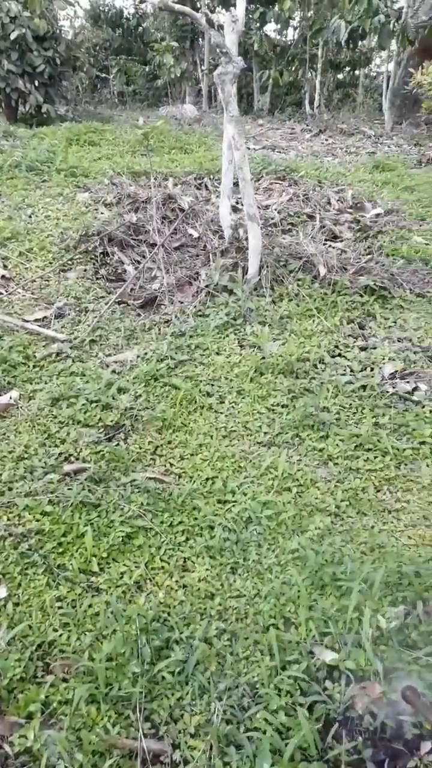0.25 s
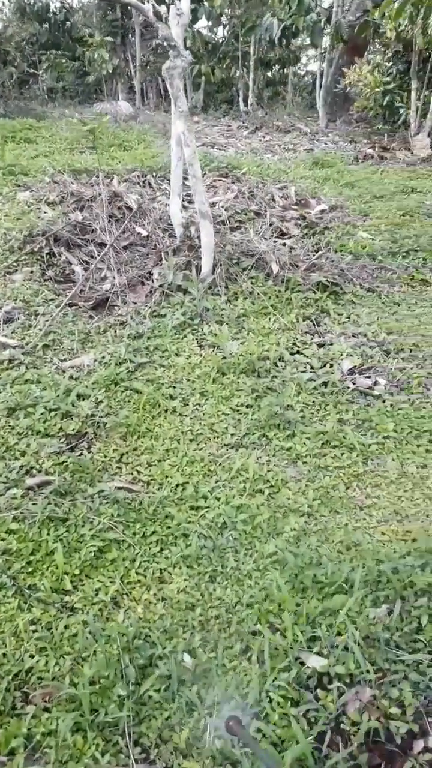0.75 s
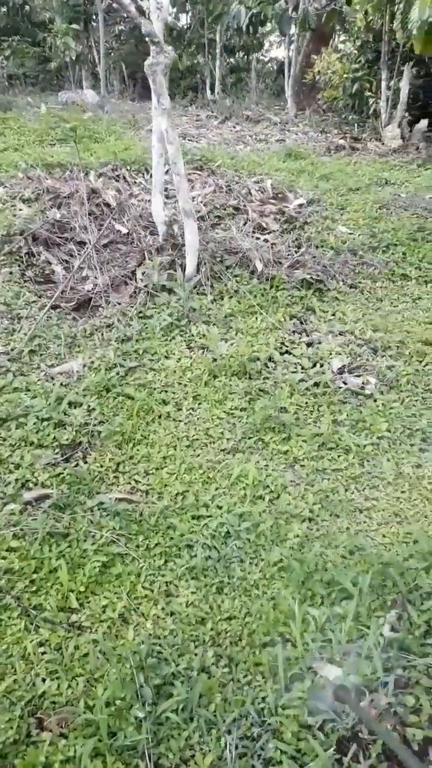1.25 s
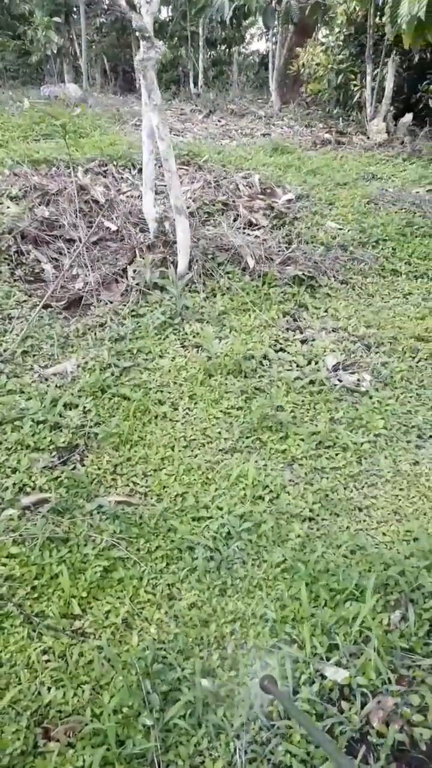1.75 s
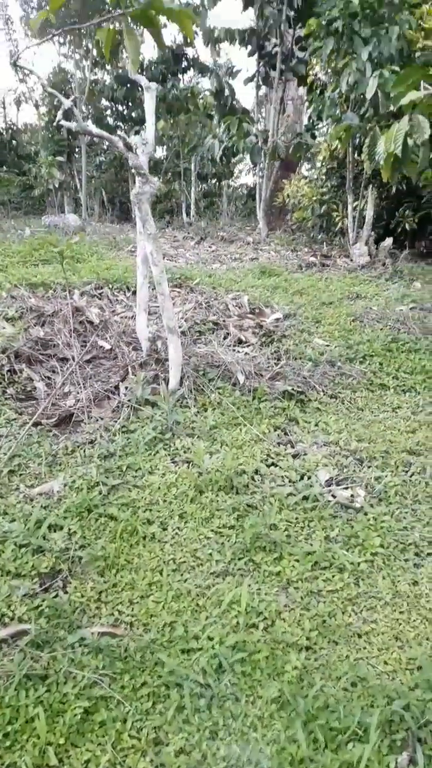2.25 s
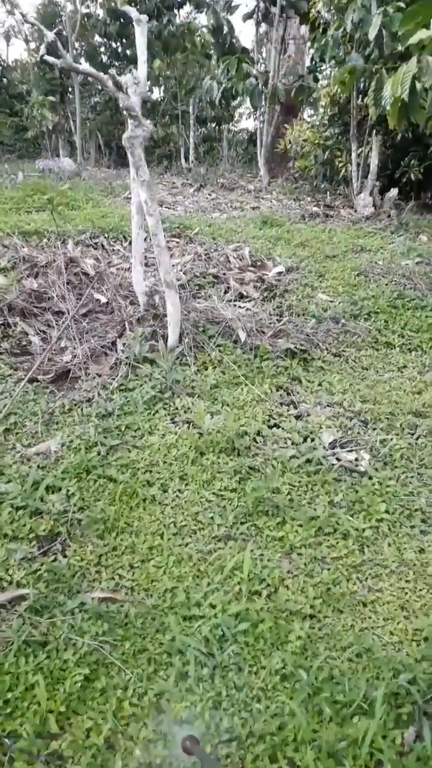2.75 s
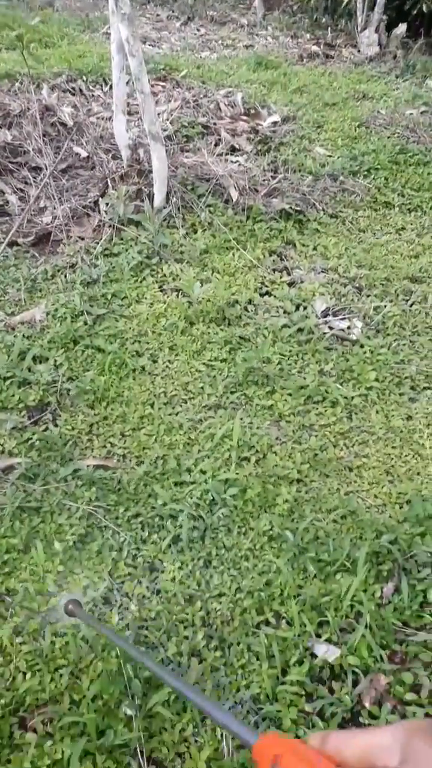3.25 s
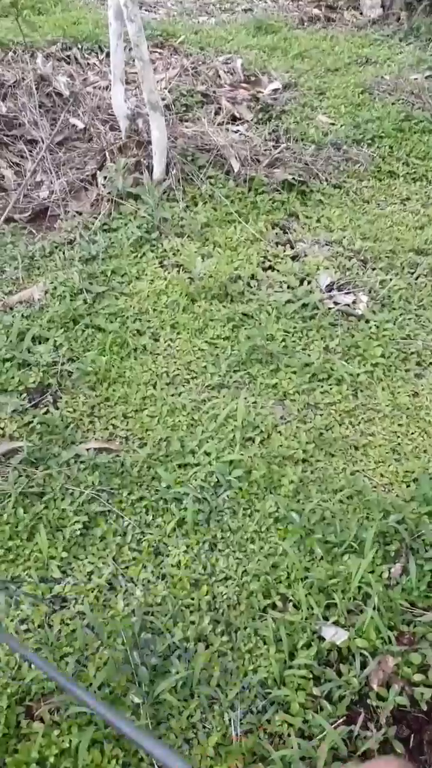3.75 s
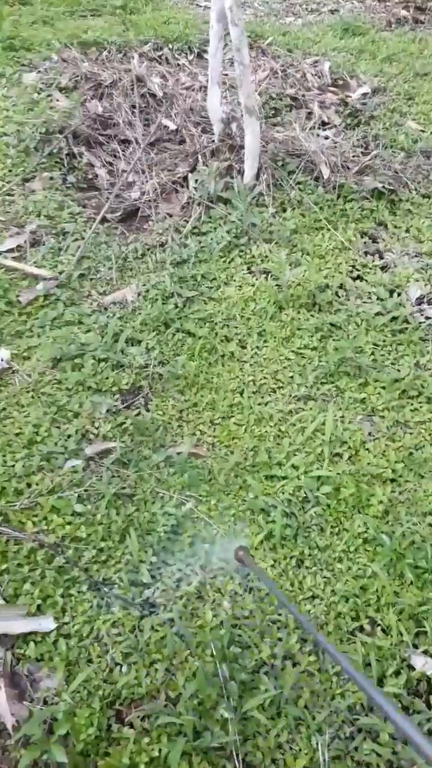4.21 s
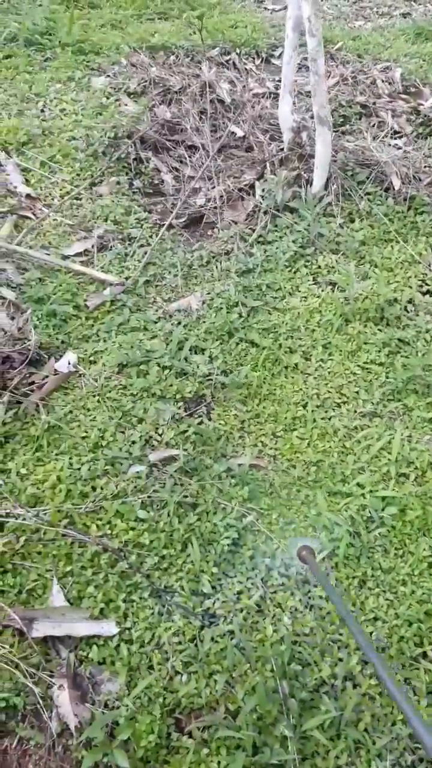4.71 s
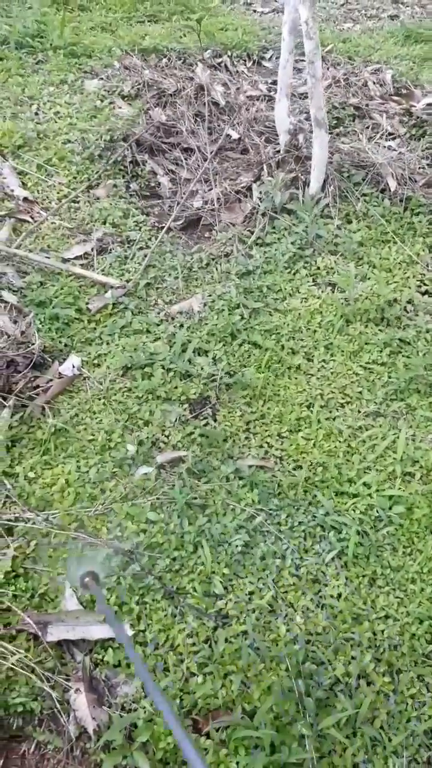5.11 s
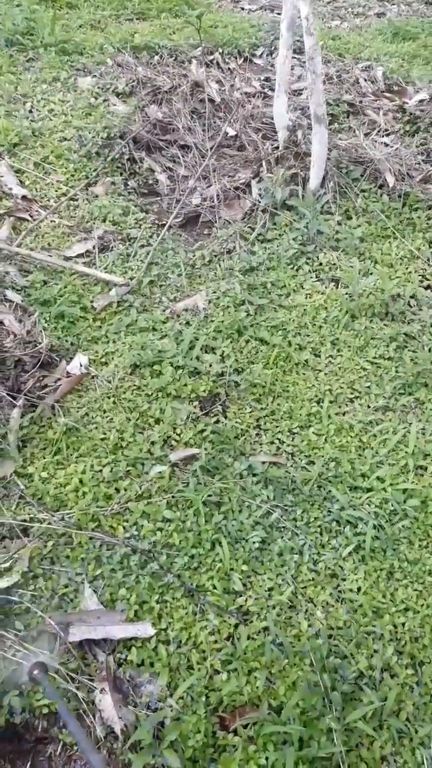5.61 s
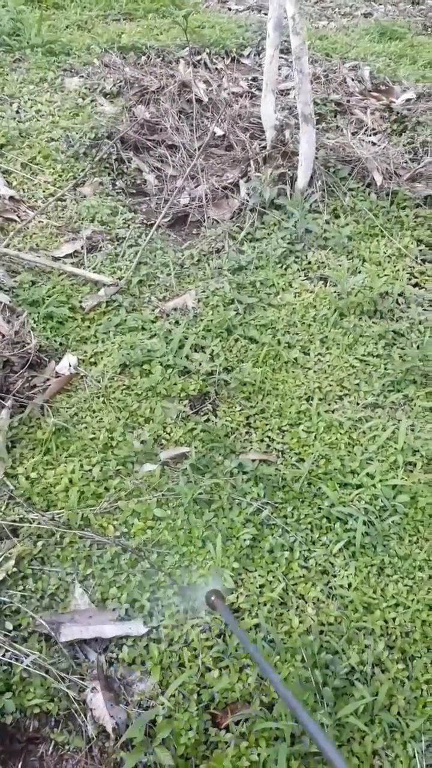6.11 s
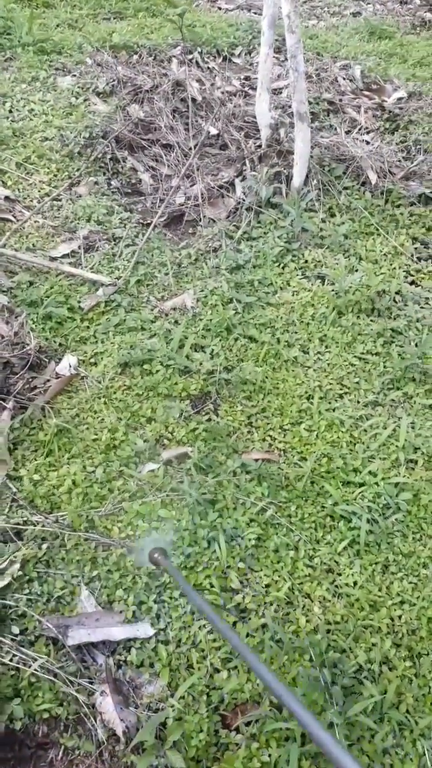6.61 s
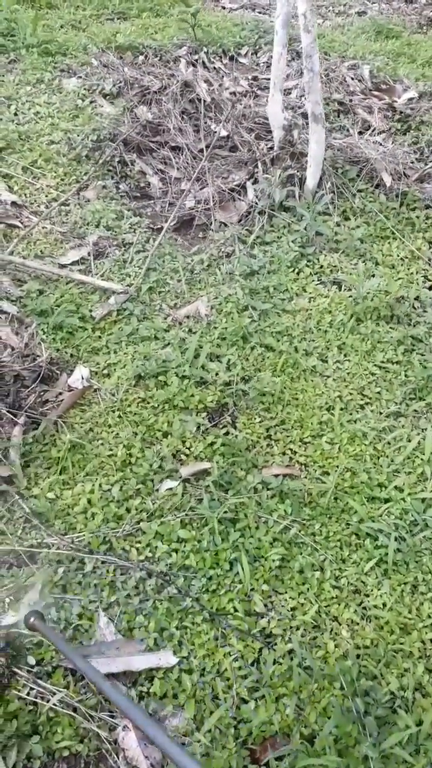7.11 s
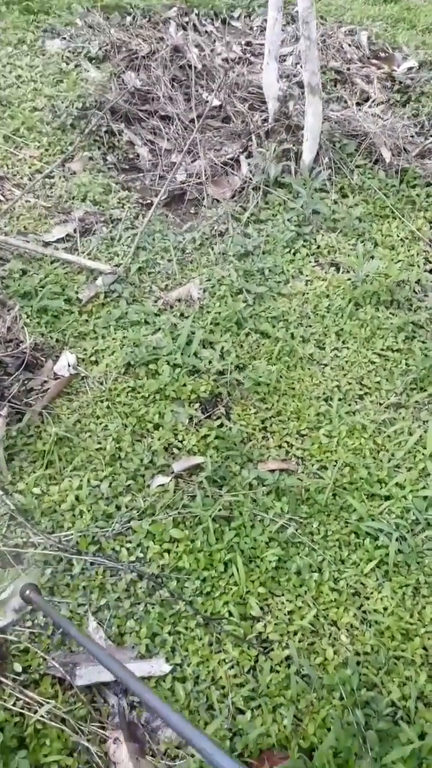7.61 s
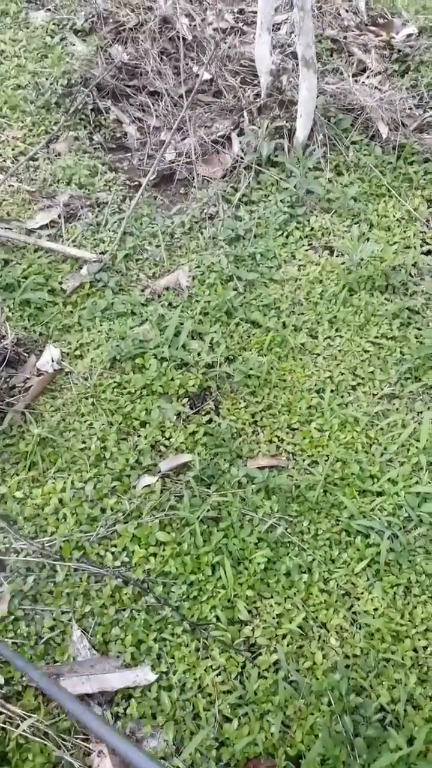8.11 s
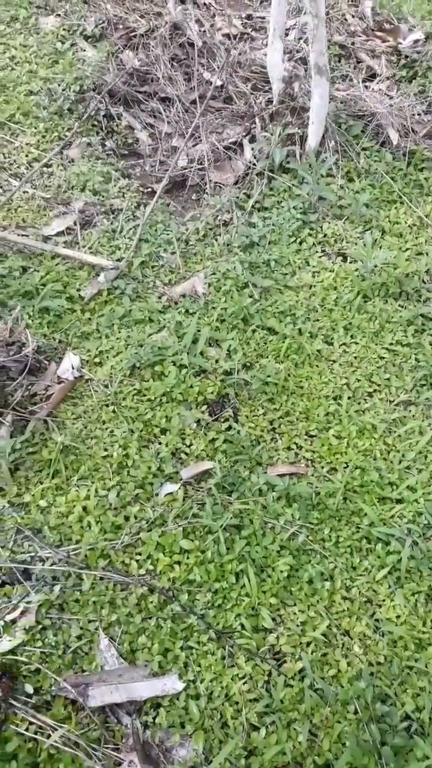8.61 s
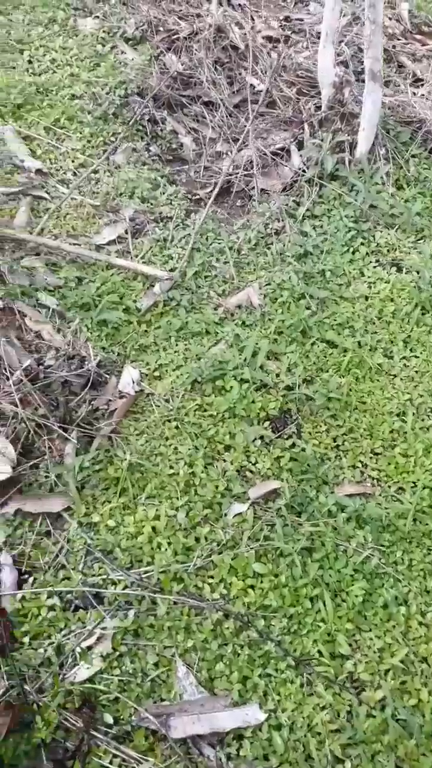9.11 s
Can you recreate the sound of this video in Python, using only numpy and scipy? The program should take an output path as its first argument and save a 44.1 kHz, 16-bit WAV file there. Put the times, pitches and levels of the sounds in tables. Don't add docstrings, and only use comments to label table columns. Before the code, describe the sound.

A spray lance hisses and fizzes steadily, fine mist pattering on leaves, with low wind thumps early on and a few dry twig snaps.

```python
import sys
import numpy as np
from scipy import signal
from scipy.io import wavfile
from scipy.ndimage import uniform_filter1d

SR = 44100
rng = np.random.default_rng(int(sys.argv[2]) if len(sys.argv) > 2 else 0)


def store_pcm(level_fs):
    pcm = np.round(np.clip(level_fs, -1, 1) * 32767).astype(np.int16)
    wavfile.write(sys.argv[1], SR, np.atleast_2d(pcm).T)


def level_to_linear(level):
    exponent = np.asarray(level, float) / 20
    return 10 ** exponent


N = 412335


def evened(x):
    return x / np.sqrt(np.mean(abs(x) ** 2) + 1e-20)


def add(mix, s, sound):
    part = mix[round(s * SR):][:len(sound)]
    part += sound[:len(part)]


def filtered(x, order, band_hz):
    return signal.sosfilt(signal.butter(order, band_hz, "bandpass", fs=SR, output="sos"), x)


def curves(rows, t):
    s, *columns = np.transpose(rows)
    return [np.interp(t, s, column) for column in columns]


def strongest_move(rows, t):
    moves = []
    for s, rise, hold, fall, db in rows:
        rising = (t - s) / abs(rise)
        falling = 1 - (t - s - rise - hold) / abs(fall)
        moves.append(db * np.clip(np.minimum(rising, falling), 0, 1))
    return np.max(moves, axis=0)


def read(points, hz):
    f, value = np.transpose(points)
    return np.interp(np.log(hz + 1), np.log(f + 1), value)


def coloured(x, points, field_db=0, shift_hz=np.zeros(1), size=1024):
    hz, _, z = signal.stft(x, SR, nperseg=size, noverlap=size * 3 // 4)
    spectrum = evened(level_to_linear(read(points, abs(hz[:, None] - shift_hz))))
    z = z * spectrum * level_to_linear(field_db)
    return signal.istft(z, SR, nperseg=size, noverlap=size * 3 // 4)[1][:N]


def drops(per_s, spread_db, clump_db):
    size = level_to_linear(spread_db * np.minimum(rng.exponential(1, N), 5))
    size = size * (rng.random(N) < per_s / SR)
    clumps = uniform_filter1d(rng.standard_normal(N), size=300)
    clumps = evened(uniform_filter1d(clumps, size=300))
    return evened(size * rng.standard_normal(N) * level_to_linear(clump_db * clumps))


# pitch_hz, density_db (per Hz)
ORCHARD_RUMBLE = [(25, -9), (60, -33), (129, 0), (172, -9), (280, -5), (343, -1.5), (379, -2), (451, -1.5),
                  (545, -5), (718, -3), (994, -2), (1200, -2), (1560, -12), (2640, -120)]


def air(field):
    return coloured(rng.standard_normal(N), ORCHARD_RUMBLE, field - 45.5)


# start_s, length_s, eddy_level_db, eddy_pitch_hz
GUSTS = [(.35, 0.36, -63, 100), (1.158, 0.16, -41, 100), (1.283, 0.41, -22.5, 129), (1.79, 0.49, -35, 110),
         (2.438, 0.29, -44, 105), (2.85, 0.27, -67, 100), (4.5, .2, -51, 140), (4.69, 0.24, -50, 130),
         (5.1, .3, -61.5, 100), (7.0, 0.27, -65, 100), (7.802, 0.29, -55, 181.5)]


def gust(t, edge_db=15, still_db=-69):
    levels = []
    for s, length, db, _ in GUSTS:
        levels.append(db - edge_db * (2 * (t - s) / length - 1) ** 4)
    levels = np.array(levels)
    return np.maximum(levels.max(0), still_db), np.array(GUSTS)[levels.argmax(0), 3]


# centre_s, peak_db, pitch_hz
PUFFS = [(1.060, -46, 110), (1.090, -41, 95), (1.115, -45, 120), (1.1403, -33, 134),
         (1.1804, -37, 124), (1.1982, -38, 95), (1.2127, -25.5, 114), (1.2238, -33.7, 95),
         (1.2457, -32, 112), (1.279, -29.9, 119), (1.2934, -32.6, 113), (1.3142, -19.5, 133),
         (1.337, -22, 230), (1.3438, -13.5, 137), (1.3569, -15, 151), (1.3764, -14, 148),
         (1.3875, -19, 160), (1.397, -21, 230), (1.4006, -13, 122), (1.412, -21, 160),
         (1.425, -19, 131), (1.4376, -22, 170), (1.4623, -17, 136), (1.478, -14, 200),
         (1.4959, -17, 131), (1.5175, -15, 181), (1.5239, -16, 160), (1.5531, -23.7, 173),
         (1.5758, -19, 148), (1.592, -21, 150), (1.6005, -20.5, 270), (1.605, -10.5, 191),
         (1.6194, -16, 152), (1.6369, -14.5, 167), (1.6558, -20, 114), (1.6645, -18, 160),
         (1.6767, -16.5, 140), (1.6901, -15, 140), (1.7091, -16, 170), (1.7265, -16.5, 230),
         (1.7394, -17.5, 114), (1.7576, -31, 125),
         (1.815, -34, 100), (1.826, -33, 90), (1.8552, -33, 95), (1.8732, -28, 123), (1.888, -31, 90),
              (1.9023, -25, 110), (1.912, -25, 100), (1.9254, -27, 118), (1.939, -26, 162),
              (1.9582, -20, 105), (1.973, -23, 130), (1.9822, -27, 105), (1.999, -21, 152),
              (2.015, -24, 100), (2.0334, -16.5, 129), (2.043, -19.5, 243), (2.047, -26, 277),
              (2.051, -13.5, 143), (2.06, -20, 110), (2.077, -25, 143), (2.1222, -28, 88),
              (2.143, -28, 121), (2.1655, -29, 112), (2.179, -27, 199), (2.1853, -26, 162),
              (2.198, -26, 95), (2.221, -35.4, 129), (2.2462, -36, 85), (2.270, -41, 70), (2.462, -36, 100),
              (2.5075, -37, 117), (2.544, -29, 115), (2.5569, -38, 103), (2.588, -36, 130),
              (2.611, -32.0, 117), (2.640, -28, 106), (2.685, -41, 95), (4.5444, -28, 125),
              (4.577, -38, 122), (4.660, -42, 110), (4.7178, -28, 125), (4.733, -37, 132),
              (4.7525, -31.9, 136), (4.838, -30.0, 122), (4.8537, -37, 163)]


def eddies(per_s=46, spread_db=-2, spread_oct=0.15, suck=0.51, suck_spread=0.058):
    late, size, pitch = rng.standard_normal((600, 3)).T
    s = (np.arange(600) + 3 + .25 * late) / per_s
    db, hz = gust(s)
    small_db = db + spread_db * size.clip(-2, 1.2)
    small = np.transpose([s, small_db, hz * 2 ** (spread_oct * pitch), *rng.random((600, 3)).T])
    hard = PUFFS
    phases = suck + rng.standard_normal((len(hard), 3)) * [suck_spread, 2 * suck_spread, 1]
    return np.vstack([small[db > -55], np.hstack([hard, phases])])


def wind(cycles=0.58, edge=0.4, sway=0.15, churn_db=-10, draught_top_db=-51):
    out = np.zeros(N)
    t = np.arange(-.04, .04, 1 / SR)
    for s, db, hz, phase, edge_phase, sway_phase in eddies():
        push = np.exp(-(t * hz / cycles) ** 2) * np.cos(2 * np.pi * (hz * t + phase))
        sharp = edge * (min(hz, 185) / 170) ** 2 * level_to_linear(0.22 * (db + 18))
        edge_tone = np.cos(2 * np.pi * (1.68 * hz * t + edge_phase))
        push += sharp * np.exp(-(t * hz * 1.7 / cycles) ** 2) * edge_tone
        sway_tone = np.cos(2 * np.pi * (75 * t + sway_phase))
        push += sway * (125 / hz) ** 2 * np.exp(-(t * 60) ** 2) * sway_tone
        add(out, s - .04, level_to_linear(db) * push)
    churn = evened(filtered(rng.standard_normal(N), 4, [80, 250]))
    strength = np.sqrt(abs(uniform_filter1d(out ** 2, size=1100)))
    draught = evened(filtered(rng.standard_normal(N), 3, [52, 100]))
    calm = level_to_linear(np.minimum(gust(np.arange(N) / SR)[0], draught_top_db) + 2.5)
    return out + level_to_linear(churn_db) * strength * churn + calm * draught


# start_s, length_s, level_db
SCUFFS = [
    (3.86, 0.14, -42.5),
    (3.82, .03, -51),
    (6.72, 0.096, -50.5),
    (0.19, 1.23, -53),
    (5.9, 1.4, -56),
    (8.67, 0.083, -44),
]


def scuffs():
    level, t = np.zeros(N), np.arange(N) / SR
    for s, length, db in SCUFFS:
        level += level_to_linear(db) * np.sin(np.pi * np.clip((t - s) / length, 0, 1)) ** .5
    return level * evened(filtered(drops(900, 2.6, 2.2), 2, (342, 820)))


def strike(ms_gone, rise_ms):
    return 1 - np.exp(-(ms_gone / rise_ms) ** 2)


def ring(ms_gone, hz, decay_ms):
    return np.sin(2 * np.pi * hz * ms_gone / 1000) * np.exp(-ms_gone / decay_ms)


# start_s, peak_db, low_ring_hz, low_ring_db, ring_ms
SNAPS = [(3.243, -6.5, 840, -13.5, 0.84), (3.2436, -24, 1600, -1, 0.51), (3.2435, -44, 620, 9, 1.5),
         (3.2448, -19, 2750, 0, 0.35), (3.2455, -27, 1400, -2, 0.67), (3.8715, -29, 5950, 10, 0.62),
         (3.874, -27, 6100, 10, .7), (3.877, -31, 6300, 11, .6), (3.889, -33, 1000, 8, 0.62),
         (3.889, -24, 2570, 1, .4), (3.905, -26, 4400, 2, .4), (3.914, -22, 3300, -2, 0.36),
         (3.9175, -22, 4300, 1, .4), (3.921, -22, 3300, 2, 0.46), (3.929, -24, 3300, 1, .4),
         (3.936, -21, 4000, -4, 0.5), (3.942, -27, 3400, 3, 0.44), (3.946, -27, 3020, 2, .5),
         (3.955, -26, 4800, 4, .4), (6.5645, -30, 5800, 10, .6), (6.568, -26, 5900, 9, .4),
         (6.573, -29, 5700, 8, .3), (8.681, -40, 610, 9.5, 1.8), (8.689, -46, 756, 7, 3),
         (8.697, -44, 620, 6, 3), (8.704, -47, 654, 9, 3.3), (8.7206, -30, 980, 7, 0.9),
         (8.722, -42, 600, 6, 1.5)]
# pitch_hz, level_db, ring_time_factor
TWIG_MODES = [
    (3680, -4.5, 0.75),
    (4250, -2, 0.6),
    (7950, -2, 0.62),
    (13800, -26, .3),
]


def snaps(rise_ms=.17):
    out, ms_gone = np.zeros(N), np.arange(500) / SR * 1000
    for s, db, low_hz, low_db, ms in SNAPS:
        crack = np.zeros(500)
        for hz, mode_db, factor in TWIG_MODES + [(low_hz, low_db, 1.6)]:
            crack += level_to_linear(mode_db) * ring(ms_gone, hz, ms * factor)
        add(out, s, -level_to_linear(db) * crack * strike(ms_gone, rise_ms) / 0.62)
    out = out - .7 * signal.lfilter(*signal.iirpeak(6500, 4, fs=SR), out)
    return filtered(out, 2, [350, 9500])


# start_s, peak_db, ring_hz, ring_ms
SLAPS = [
    (3.2432, -23, 7480, .6),
    (3.2455, -26, 850, .9),
    (4.1219, -12, 1650, .3),
    (4.12192, -18, 3120, .8),
    (4.12195, -17, 3900, .3),
    (4.12197, -17, 4700, .4),
    (4.1221, -24, 8500, .7),
    (6.8976, -11, 2500, .3),
    (6.89765, -23, 3300, .5),
    (6.8977, -23, 1700, .4),
]


def slaps(rise_ms=.19):
    out, ms_gone = np.zeros(N), np.arange(400) / SR * 1000
    for s, db, hz, ms in SLAPS:
        add(out, s, level_to_linear(db) * ring(ms_gone, hz, ms) * strike(ms_gone, rise_ms))
    return out


# start_s, shadow_hz, shadow_depth_db, echo_dip_hz, echo_depth_db
BODY = [(0, 5860, 4, 2650, 6), (.6, 6200, 2, 2670, -1), (.9, 6250, -1.5, 2690, 4), (2, 6300, 0.5, 2750, 4),
        (3.1, 6500, -1, 2740, 4), (3.6, 6000, 4, 3040, 6), (4, 6200, 1, 2900, 1), (4.3, 6300, -4, 2800, 5),
        (5, 6440, -6, 2530, 2), (5.3, 6600, 4, 2740, 7), (5.8, 6700, 5, 2650, 2),
        (6.1, 6500, -3, 2760, -2.5), (6.7, 6740, -4.5, 2750, -0.5), (7, 6650, 6, 3110, 9),
        (8, 6500, 4.5, 2900, 6), (8.3, 6500, -2, 2880, 0), (8.7, 6400, 0, 2850, 0),
        (9.35, 6400, -3.5, 2820, -2)]


def body(t):
    return curves(BODY, t)


def dip(hz, centre, depth_db, width_hz):
    return -depth_db * np.exp(-((hz - centre) / width_hz) ** 2)


# start_s, first_dip_hz, first_depth_db, second_dip_multiple, second_depth_db
POSE = [(0, 930, 13, 1.68, 11), (.9, 970, 9, 1.74, 7), (1.5, 970, 6.5, 1.48, 8), (2.6, 900, 9, 1.63, 6),
        (3.3, 910, 7, 1.63, 7), (3.6, 910, 6, 1.9, 1.5), (3.95, 950, -1.5, 1.6, -3),
        (4.3, 1000, 7, 1.6, 2.5), (4.9, 1040, 11, 1.58, 8.5), (5.3, 1100, 11, 1.5, 1.5),
        (5.95, 1090, 10, 1.55, 0), (6.15, 1070, 9, 2.05, 2), (6.7, 1000, .3, 2.2, 0), (7, 1030, 3, 2.1, 4),
        (8, 925, 5.5, 2.1, -1.5), (8.3, 1020, 5, 1.8, 5.5), (9.35, 1020, 0, 1.8, 0)]
# start_s, ring_hz, lift_db
BLADES = [(0, 5000, -5), (.25, 5050, 0), (.47, 5050, 4), (.65, 5100, 0), (1.1, 3850, 0), (1.8, 4300, -2),
          (2, 4250, 5), (2.3, 4250, 2), (2.8, 4500, 2.5), (3.4, 5000, 1.5), (4.2, 4900, -1),
          (5.4, 4800, 1.5), (6.8, 5200, -1.5), (7.1, 5200, 3), (7.8, 5100, 0), (8.35, 5100, -0.5),
          (8.6, 4530, 2), (9.35, 4500, 2.5)]
# start_s, shade_hz, depth_db
ARM = [(0, 14000, -3), (.7, 13900, -2), (1.2, 9600, -0.5), (1.85, 9200, 5), (2.05, 9900, -3),
       (2.4, 11500, 2), (2.7, 12300, 2), (3.2, 13100, -1), (3.6, 14300, 2), (4, 13300, 2),
       (4.35, 14000, -1), (4.7, 14000, 8), (5.3, 14500, 1), (5.85, 13300, 6), (6.2, 15000, 4),
       (6.6, 14500, -1), (6.9, 13500, 3), (9.35, 13500, 1)]


def colouring(patchy_db=1.16):
    hz, t, z = signal.stft(np.zeros(N), SR, nperseg=1024, noverlap=768)
    hz = hz[:, None]
    patches = uniform_filter1d(rng.standard_normal(z.shape), size=8, axis=0)
    patches = patchy_db * evened(uniform_filter1d(patches, size=80, axis=1))
    first_hz, first_db, multiple, second_db = curves(POSE, t)
    ground = dip(hz, first_hz, first_db, 130) + dip(hz, multiple * first_hz, second_db, 170)
    shadow_hz, shadow_db, echo_hz, echo_db = body(t)
    beside = dip(hz, shadow_hz, shadow_db, 450) + dip(hz, echo_hz, echo_db, 170)
    blade_hz, lift_db = curves(BLADES, t)
    blades = dip(hz, blade_hz, -lift_db, 300)
    arm = dip(hz, *curves(ARM, t), 700)
    return t, patches + ground + beside + blades + arm


# start_s, rise_s, hold_s, fall_s, gain_db
SWINGS = [(-0.1, .1, .4, 0.75, 4.5), (.38, 0.089, .07, .15, 5), (0.93, 0.062, .05, 0.44, 3.5),
          (3.472, 0.072, 0.23, 0.064, 6), (3.855, 0.051, .02, .05, 2.5), (5.16, 0.21, 0.26, 0.42, 11.5),
          (5.83, 0.12, .01, 0.12, 8), (6.717, 0.32, 0.31, 1.8, 7.5), (7.795, 0.38, 0.38, .3, 10),
          (8.297, 0.27, 0.31, 1.14, 12.5), (9.2, 0.14, .1, .1, 10.5)]


def nearness(t):
    return strongest_move(SWINGS, t)


# start_s, rise_s, hold_s, fall_s, gain_db
TURNS = [(-.1, .1, .03, 0.41, 4), (.36, .12, .03, 0.22, 3), (.8, .2, 0.28, 0.65, 1.5),
         (2.3, 0.17, .02, 0.23, 2), (2.9, .4, .1, .1, 1.5), (3.4, .2, .06, 0.56, 6),
         (4.3, .12, 0.62, .3, 1), (5.16, 0.17, 0.37, 0.24, 11.5), (5.6, 0.15, .02, 0.7, 7.5),
         (6.72, 0.39, .03, 2.2, 8.5), (7.84, 0.54, .02, .6, 11.5), (8.3, 0.32, 0.23, 0.91, 11),
         (9.1, .25, .1, .1, 9)]


def facing(t):
    return strongest_move(TURNS, t)


# start_s, patter_drift_db, dry_litter_db, leaf_ring_shift_hz, fizz_tilt_db (per octave)
AIM = [(0, 0.5, -1, -400, -3), (.5, -1, -1, -330, -8), (.8, -2.5, 4, 120, 0), (1.4, 1, -4, 120, 5),
       (2.25, -0.5, 1.5, -150, -1), (2.8, 0.5, -0.5, -100, -3), (3.45, 1.5, -12, 150, 1),
       (3.8, 2.5, -3, 50, -1), (4.1, 3, -13, -100, -1), (4.7, -5, -4, -100, -3), (5.2, 1, -22, 0, 4),
       (5.75, 0, -11, -200, 6), (6.2, -0.5, -15, -200, 6), (6.8, 2.5, -12, -50, 0), (7.05, 1, 6, -70, 2),
       (8.42, 1, 1.5, -20, 0), (8.54, -3, -5.5, -50, -3), (9.35, -3, -1, -200, -1)]


def aim(t):
    return curves(AIM, t)


# pitch_hz, density_db (per Hz)
THUD = [(200, -70), (500, -39), (900, -7), (1150, -7), (1400, -1), (1950, 0.5), (2500, -2.1), (3000, -2.5),
        (4000, -14), (7000, -70)]
# start_s, rise_s, hold_s, fall_s, gain_db
DRUMS = [
    (.2, 0.059, 0.074, 0.16, 1.5),
    (3.6, .17, .02, .08, 3),
    (3.86, .04, .06, .05, 0.5),
    (4.3, 0.32, .5, 0.33, 2),
    (5.85, .08, 0.12, 0.12, 1.5),
    (8.2, 0.18, .04, 0.089, 3.5),
]


def thud(t, field):
    level_db = -41 + 0.39 * nearness(t) + strongest_move(DRUMS, t)
    return coloured(drops(12000, 0.81, 0.2), THUD, field + level_db)


# pitch_hz, density_db (per Hz)
CUPS = [(1500, -70), (2700, -22), (3100, -9), (3280, -4), (3650, -0.5), (3950, -2), (4300, -12),
        (5200, -16), (7000, -70)]


def cups(t, field):
    drift_db, litter_db, shift_hz, _ = aim(t)
    level_db = -43.5 + nearness(t) + drift_db + litter_db
    return coloured(drops(12000, 0.85, 1.0), CUPS, field + level_db, shift_hz)


# pitch_hz, density_db (per Hz)
PATTER = [(1500, -72), (2400, -8.5), (3000, -7.5), (3800, -2), (4300, 0.5), (4700, 0), (5150, 0.7),
          (5700, -2.5), (6500, -7), (7300, -14), (8500, -16), (11000, -69)]


def patter(leaves, t, field):
    return coloured(leaves, PATTER, field - 38.5 + nearness(t) + aim(t)[0])


# pitch_hz, density_db (per Hz)
HISS = [(3500, -70), (5000, -14.5), (6200, -7), (7000, -0.5), (7600, 2), (8100, 2.5), (8600, 0.5),
        (9000, -5.5), (9500, -13.5), (10200, -20), (12000, -60)]


def hiss(leaves, jet, t, field):
    shift_hz = 170 - 15 * body(t)[1]
    return coloured(0.52 * leaves + 1.034 * jet, HISS, field - 40.5 + facing(t), shift_hz)


# pitch_hz, density_db (per Hz)
FIZZ = [(5000, -70), (8000, -25), (9300, -9), (10200, -7.5), (11500, -2.5), (13000, -1), (14800, 0),
        (15500, 0)]


def fizz(jet, t, field):
    octaves = np.log2(np.fft.rfftfreq(1024, 1 / SR)[:, None] / 12500 + 1e-3)
    level_db = -35.5 + 0.33 * nearness(t) + 0.45 * facing(t) + aim(t)[3] * octaves
    return coloured(0.59 * jet + 0.78 * jet[::-1], FIZZ, field + level_db)


def spray(t, field):
    leaves, jet = drops(16000, 0.78, 0.31), drops(25000, 0.39, 0.46)
    landing = thud(t, field) + cups(t, field) + patter(leaves, t, field)
    return landing + hiss(leaves, jet, t, field) + fizz(jet, t, field)


def scene():
    t, field = colouring()
    mono = air(field) + wind() + scuffs() + snaps() + slaps() + spray(t, field)
    return np.tile(mono, (2, 1))


# start_s, low_hz, high_hz
REFILLS = [(.453, 5120, 6330), (.453, 13740, 15200), (.849, 4180, 6310), (.849, 13070, 14450),
           (1.941, 8200, 9670), (2.196, 10980, 12440), (2.334, 8200, 9690), (2.452, 5620, 8310),
           (2.452, 8910, 10360), (2.52, 12340, 13820), (4.402, 9580, 11070), (6.773, 12400, 13820),
           (7.421, 4610, 5730), (7.421, 7560, 8980), (7.421, 10960, 12440), (9.092, 4130, 5210),
           (9.092, 6220, 8310)]


def refill(x, apart=0.76, kept=0.67):
    out = x.copy()
    window = signal.windows.kaiser_bessel_derived(2048, 4 * np.pi) ** 2
    for s, low_hz, high_hz in REFILLS:
        at = round((s * SR - 627) / 1024) * 1024 - 397
        sos = signal.butter(6, [low_hz, high_hz], "bandpass", fs=SR, output="sos")
        band = signal.sosfiltfilt(sos, x[0, at - 512:at + 3584])
        now, later = band[512:2560], band[1536:3584]
        sides = apart * later * np.array([[1], [-1]])
        out[:, at:at + 2048] += window * ((kept - 1) * now + sides)
    return out


def low_pass(x):
    return signal.sosfilt(signal.butter(12, 15540, fs=SR, output="sos"), x)


def record(dry):
    cut = signal.sosfilt(signal.butter(2, 45, "highpass", fs=SR, output="sos"), dry)
    cut = signal.sosfilt(signal.ellip(8, .1, 60, 15620, fs=SR, output="sos"), cut)
    return low_pass(refill(cut))


dry = scene()
out = record(dry)
store_pcm(out)
```